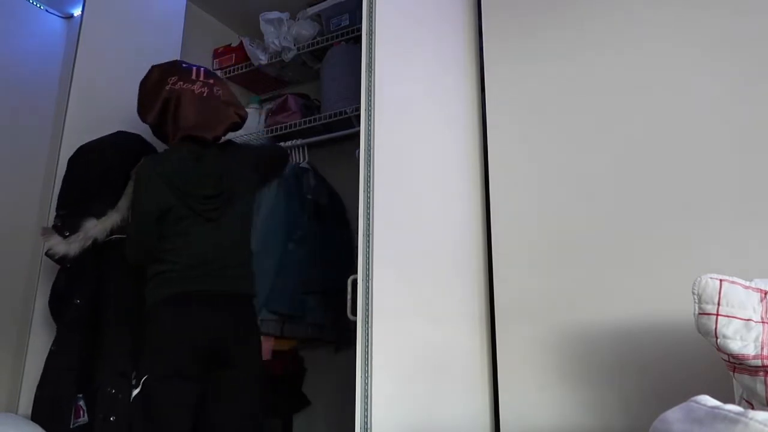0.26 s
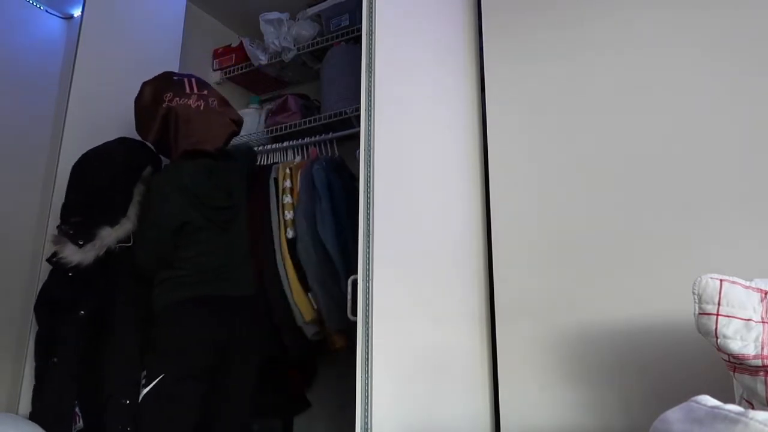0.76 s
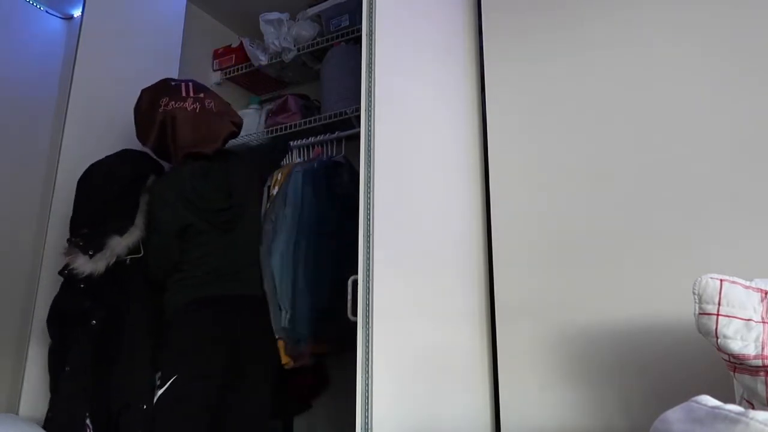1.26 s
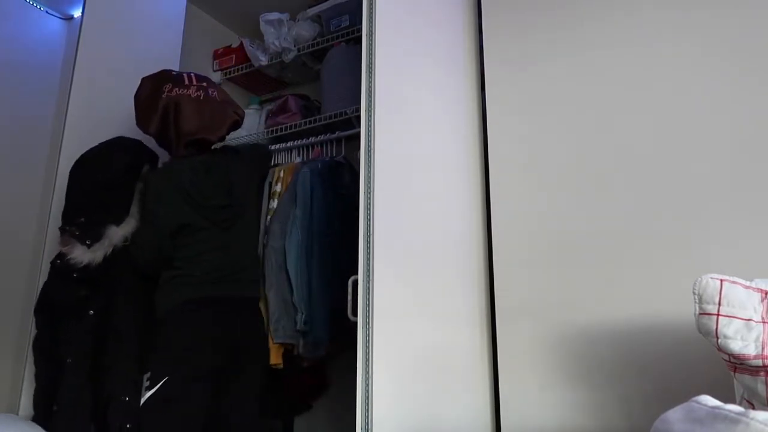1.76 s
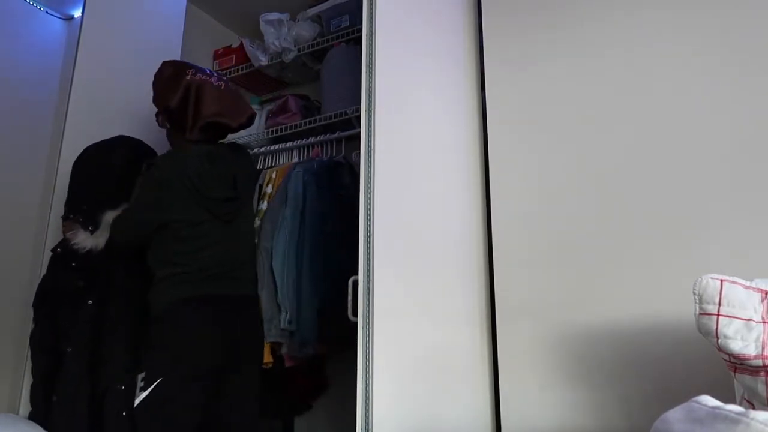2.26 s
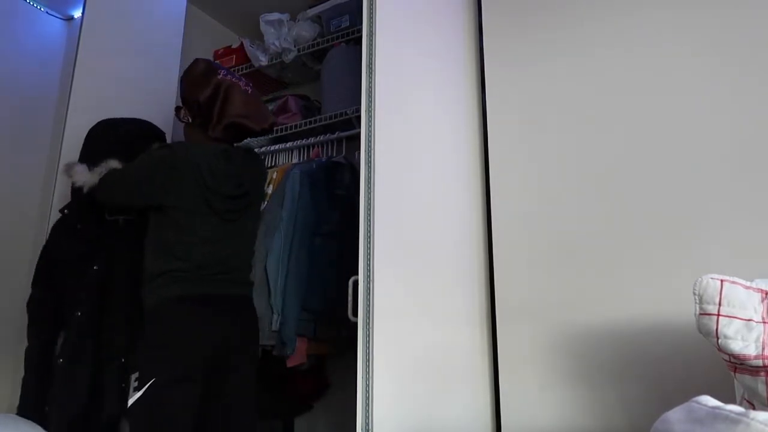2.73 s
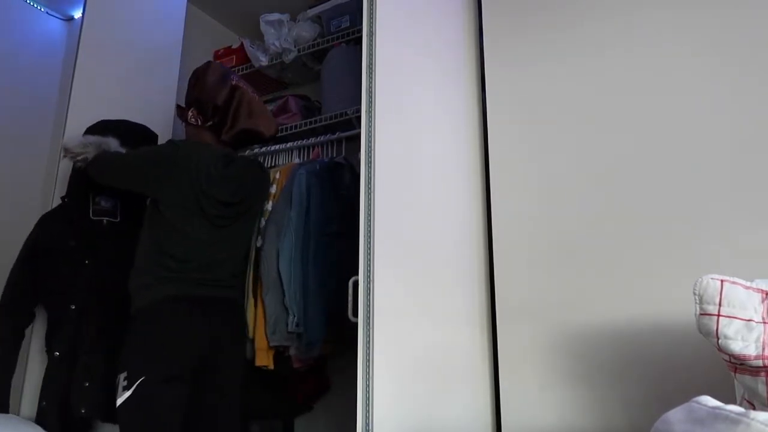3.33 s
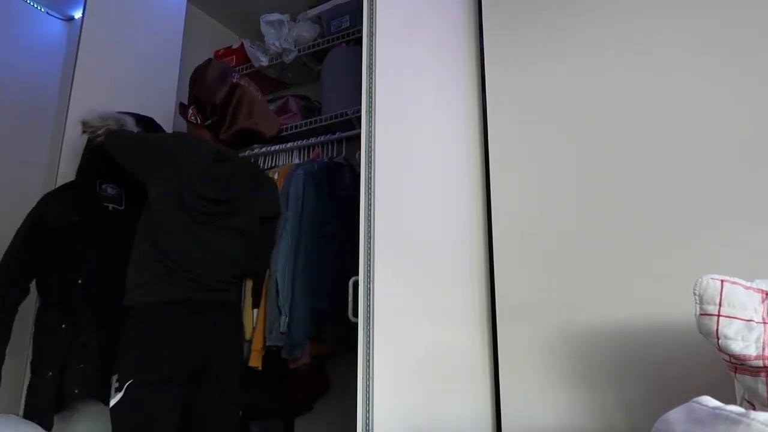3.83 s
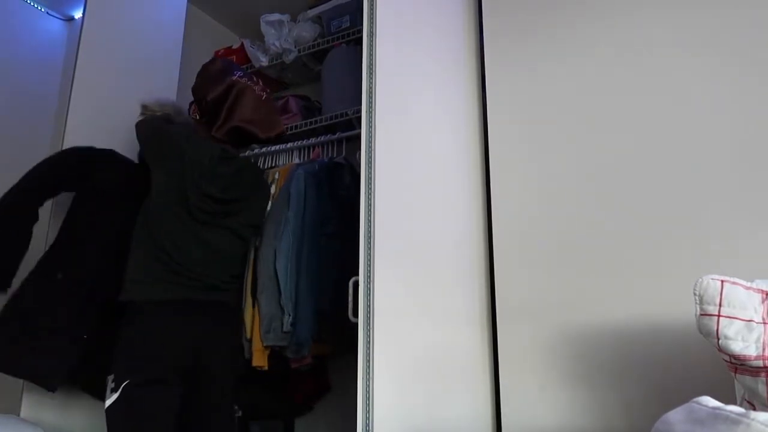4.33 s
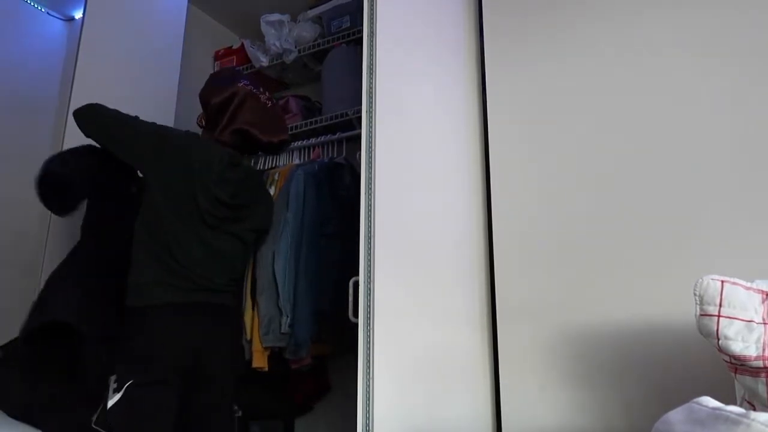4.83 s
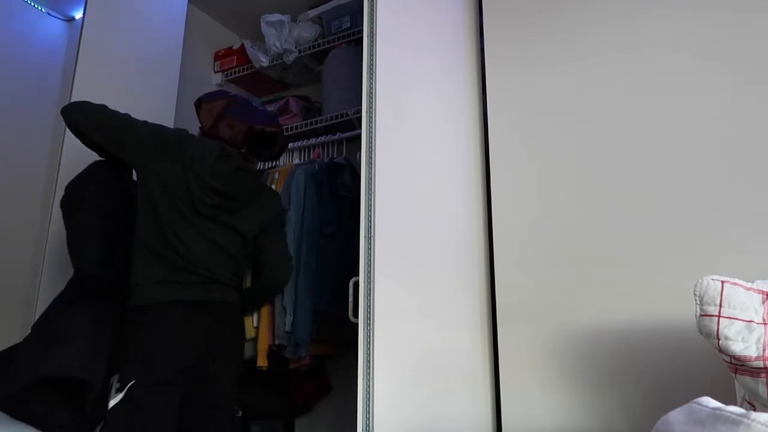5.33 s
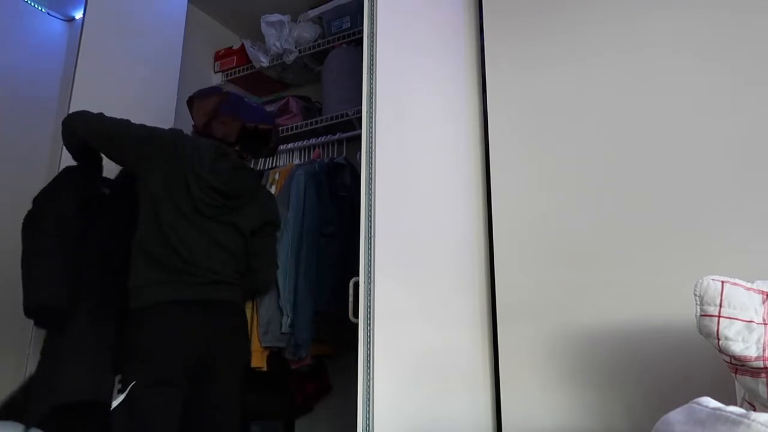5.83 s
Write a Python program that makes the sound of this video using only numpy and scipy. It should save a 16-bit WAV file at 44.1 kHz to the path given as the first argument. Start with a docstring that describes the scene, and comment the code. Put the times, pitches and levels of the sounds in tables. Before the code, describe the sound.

A quiet bedroom with low, soft house rumble and faint hiss. For the first second only clothes stir, with light swishes around 0.5-0.8 s. At about 1.1 s wire hooks clink and scrape in a quick metallic flurry, brightest near 1.17 s, followed by scattered light ticks and short drags until 2 s. A very loud, sharp hanger clack lands at 2.24 s, leaving the wire shelf trembling. More scraping and clinks lead to strong double clacks near 2.69 and 2.9 s, amid cloth swishes; a dull shelf knock follows at 3.1 s. From 3.4 s it is calmer: faint taps, then a crisp cluster at 4.17-4.2 s as a heavy coat rustles. Small dry rattles come around 4.8-5.2 s, then weaker taps. Coat fabric brushes more fully towards 6 s. The room decay is short, in clear, close stereo.

```python
"""Hangers hung and pushed along a wire closet rod in a bedroom: hooks clink, scrape and clack, the wire shelf
thuds, and later a coat beside the rod knocks. Contacts are grainy noise bursts rung through resonances, each
with its diffuse room answer; drags are spiky noise. Coats rustle as patchy shaped noise around the rod, and the
quiet room rumbles in two low bands. A close pair of microphones hears it all from across the room, with faint
hiss of its own."""
import sys
import numpy as np
from scipy import signal
from scipy.fft import rfft, irfft, next_fast_len
from scipy.io import wavfile
from scipy.ndimage import uniform_filter1d, map_coordinates

SR = 44100
rng = np.random.default_rng(int(sys.argv[2]) if len(sys.argv) > 2 else 0)


def digitize_waveform(pressure):
    """Quantize a signal to 16-bit integers and store it at the path in sys.argv[1].

    Rows of a 2-D input are taken as channels; values are limited to [-1, 1].
    """
    field = np.atleast_2d(pressure).T
    bounded = np.clip(field, -1, 1)
    quanta = np.round(bounded * 32767).astype(np.int16)
    wavfile.write(sys.argv[1], SR, quanta)


N = 268392
TIME_S = np.arange(N) / SR

# Low noise of the house: time_s [s], deep_db [dB], low_db [dB]
RUMBLE_LEVELS = [(0.0, -57, -51), (0.3, -58, -44.5), (0.55, -58, -46.5), (0.72, -56, -51),
                 (0.9, -56, -49.5), (1.9, -57, -51), (2.5, -61, -51.5), (3.1, -52.5, -51),
                 (3.35, -63, -52.5), (3.75, -55, -54), (4.4, -56, -46.5), (4.8, -60, -49.5),
                 (5.1, -64, -48.5), (5.4, -58, -50.5), (5.8, -60, -48), (6.09, -50, -47)]
# Soft low bumps: middle_s [s], length_s [s], deep_db [dB], low_db [dB]
THUMPS = [(1.598, 0.17, -44.5, -51), (2.117, 0.22, -48, -39.5), (2.885, 0.14, -51, -54),
          (3.163, 0.14, -66, -56), (4.044, 0.27, -56, -66), (4.356, 0.26, -58, -60),
          (4.821, 0.11, -59, -42), (5.613, 0.081, -63, -46)]
# One deep bump through the floor: middle_s [s], length_s [s], level_db [dB], pitch_hz [Hz]
FLOOR_BUMP = (2.5, 1, -58, 33)
# Spectra of the deep and the low rumble: frequency_hz [Hz], density_db [dB per Hz]
DEEP_SPECTRUM = [(12, -39), (20, -14), (43, 3.5), (81, 6.5), (100, -16), (130, -39), (220, -120)]
LOW_SPECTRUM = [(47, -31), (80, -9.5), (129, -4), (333, -12.5), (365, -10.5), (500, -19.5), (650, -52),
                (1100, -120)]

# Steady stir of the clothes: time_s [s], level_db [dB]
STIR_LEVELS = [(0.0, -50.5), (0.9, -51.5), (1.9, -49.5), (2.5, -52), (3.1, -59.5), (3.45, -55), (3.81, -50),
               (4.37, -43.5), (4.8, -55.5), (5.32, -51.5), (5.42, -46), (5.49, -53), (5.66, -52),
               (6.09, -41.5)]
# Single strokes of cloth on cloth: middle_s [s], length_s [s], body_db [dB], sheen_db [dB]
SWISHES = [(0.53, 0.5, -68, -50.5), (0.665, 0.38, -46, -49.5), (0.816, 0.18, -60, -42.5),
           (2.109, 0.21, -41.5, -41), (2.684, 0.28, -57, -40.5), (2.815, 0.48, -39.5, -48.5),
           (2.94, 0.13, -49, -46), (3.51, 0.13, -49, -78), (4.033, 0.32, -69, -48),
           (4.348, 0.028, -39.5, -69), (4.567, 0.98, -48, -75), (4.974, 0.92, -45, -49.5),
           (5.596, 0.23, -50.5, -50.5), (5.79, 0.42, -44, -45), (5.962, 0.54, -57, -40)]
# Spectra of the cloth's soft body and fine sheen: frequency_hz [Hz], density_db [dB per Hz]
BODY_SPECTRUM = [(180, -27), (300, -1.5), (494, -2), (775, 0), (919, -2), (977, -1.5), (2100, 0.5),
                 (4310, -8), (5500, -13), (7150, -20), (12100, -120)]
SHEEN_SPECTRUM = [(2060, -4.5), (3500, 0.5), (5450, -3.5), (7770, -4.5), (9430, -21), (11400, -12.5),
                  (13900, -23.5), (15100, -41), (15500, -38)]
STIR_SHEEN_DB = -5.5  # sheen of the steady stir over its body
SHAKE_DB, SHAKE_RISE_S, SHAKE_T60_S = -31, 0.0022, 0.57  # coats shaken by a clack: level over the clack's

# Hooks dragged on the rod: start_s [s, full level reached], hold_s [s],
# low_rings_db [dB], middle_rings_db [dB], upper_rings_db [dB]
SLIDES = [(1.108, 0.42, -49.5, -58, -62), (1.33, 0.019, -45, -51, -55), (1.474, 0.024, -54, -50, -51),
          (1.769, 0.03, -51, -49, -47), (1.806, 0.032, -48, -57, -53), (2.33, 0.017, -38, -42, -73),
          (2.732, 0.13, -40.5, -40.5, -48), (3.088, 0.079, -40.5, -63, -66)]
# Hook resonances: pitch_hz [Hz], width_hz [Hz], strength_db [dB]
HOOK_MODES = [(1820, 130, 3.5), (1978, 59, 6), (2210, 240, 5.5), (2487, 75, 4.5), (2754, 75, 9),
              (2965, 68, 5.5), (3106, 250, 5.5), (3440, 150, 1), (3987, 99, -1.5), (4260, 120, -0.5),
              (4590, 130, -5.5), (5700, 860, -7), (6410, 300, -2.5)]
LOW_RINGS, MIDDLE_RINGS = HOOK_MODES[:3], HOOK_MODES[3:8]
UPPER_RINGS, TOP_RINGS = HOOK_MODES[8:11], HOOK_MODES[11:]
# Broad scratch of a dragged hook: frequency_hz [Hz], density_db [dB per Hz]
SCRATCH_SPECTRUM = [(1200, -33), (2000, 3), (3400, 8), (4800, -10), (7000, -53)]
SCRATCH_DB = -7  # over the middle rings
SLIDE_ATTACK_S, SLIDE_FADE_DB_PER_S = 0.018, 155

# In both contact tables the layer columns count from level_db, and each layer adds a fixed trim of its own.
# Light hooks touching the rod: touch_s [s], level_db [dB], upper_rings_db [dB], top_rings_db [dB],
# strongest_ring_hz [Hz], after_rattle_and_room_db [dB over the blow]
CLINKS = [(1.129, -25.5, -20, -25, 1810, 1), (1.1365, -22.5, -15, -12, 1890, 2),
          (1.149, -22, -23, -22, 1880, 3), (1.161, -25.5, -7, -15, 2080, -3),
          (1.1657, -8, -18, -9, 2270, -5.5), (1.1912, -17.5, -20, -15, 2520, -5),
          (1.203, -18.5, -20, -28, 2240, -20), (1.225, -25, -22, -28, 2020, -10),
          (1.3301, -16, -11.5, -34, 2575, -0.5), (1.4195, -28.5, -27, -13, 1930, -9),
          (1.4776, -21.5, -1, -23, 2600, -6), (1.5601, -20, -12, -6, 2550, -5.5),
          (1.7761, -21.5, -9, -15.5, 2710, 1), (1.7918, -24.5, -4, -23, 2740, -11),
          (1.796, -23, -19, -19, 2200, -15), (1.829, -23, -28, -25, 2210, 0),
          (1.833, -26.5, -14, -20, 3180, -7), (1.845, -28, -16, -32, 2220, -5),
          (1.855, -25, -23, -23, 2230, -18), (1.888, -20.5, -28, -34, 2280, -11),
          (1.897, -31, -26, -30, 1850, -3), (1.964, -16.5, -39, -7.5, 2230, -10.5),
          (2.4319, -21.5, -31.5, -17, 2220, -1), (2.4673, -22.5, -12, -7, 2240, -9),
          (2.733, -23, -9, -21, 2420, -6), (2.774, -17.5, -8, -25, 2650, -10),
          (2.797, -20, -11, -23, 2450, -4), (2.806, -19, -15, -18, 2480, -10),
          (2.838, -29, -22, -20, 2860, -8), (2.858, -22.5, -24, -25, 1960, -6)]
# Hangers knocking together and on the shelf, and from LEAVE_ROD_S on knocks at a coat beside the rod: touch_s
# [s], level_db [dB], shelf_thud_db [dB], treble_db [dB], # brightest_hz [Hz], after_rattle_and_room_db [dB over
# the blow]
CLACKS = [(1.5908, -28.5, -19, -23, 1580, -3), (2.031, -44.5, 1, -19, 1660, 9.5),
          (2.085, -20, -7.5, -4, 1840, -1), (2.113, -22.5, -28, -10, 2700, 0.5),
          (2.2352, 2, -25.5, -13.5, 1590, -6), (2.582, -31.5, -14.5, -8, 1310, 11),
          (2.59, -28, -15, -11, 2150, 4), (2.6847, -8, -22, -11, 2320, -4),
          (2.6876, -6, -17.5, -17, 2430, -5), (2.892, -3.5, -10, -11.5, 1420, -0.5),
          (2.9022, -0.5, -20.5, -6.5, 3640, -6.5), (3.118, -33.5, 0, -17, 1854, 8),
          (3.1358, -29, -6, -19, 2013, 4), (3.1579, -33, 2, -31, 2110, -2.5),
          (3.467, -37, -8, -11, 1530, -2), (3.583, -35.5, -10.5, -2, 2670, -1.5),
          (3.6638, -37, -37, 1, 2010, 0.5), (3.7106, -28, -15, -10, 2350, 4),
          (3.728, -26, -16, -15, 2300, -5), (3.774, -33.5, -21, 1.5, 3380, 1.5),
          (4.1682, -22, -15.5, -7, 2960, 4), (4.1739, -15, -21.5, -3.5, 2800, 0),
          (4.1798, -9, -34, -13, 3330, -3.5), (4.189, -17, -27, -13, 2680, -2),
          (4.22, -23.5, -28, -18, 2300, -6), (4.554, -37.5, -24, -30, 1610, 11.5),
          (4.8016, -25.5, -12, -6, 2330, 5.5), (4.815, -25.5, -10, -15, 3300, 0.5),
          (4.8874, -24.5, -16, -22, 2750, 3.5), (4.8957, -22, -13, -16, 3200, -6),
          (4.905, -23.5, -18, -15, 1740, 3), (4.915, -22, -26, -28, 3170, -16),
          (4.926, -23, -13, -14, 1760, -9), (4.945, -32, -16, -4, 4200, -18),
          (4.9957, -24.5, -18, -18, 4100, -6), (4.998, -29.5, -16, -14, 1510, -4),
          (5.1452, -21, -47, -14, 3000, 2), (5.1491, -19, -34, -14, 2900, -6),
          (5.1546, -15.5, -50, -16, 3140, -4), (5.1664, -20, -30, -9, 3280, -2),
          (5.1731, -22, -35, -10, 2700, -6), (5.186, -23.5, -23, -10, 3540, -3),
          (5.505, -37, -10.5, -24, 1990, 7), (5.583, -38.5, -3, -15, 2200, -3),
          (5.6278, -37.5, -11, -12, 2750, 4), (5.8545, -28, -13, -13, 2000, 1.5),
          (5.9365, -27.5, -42, -15, 2610, -6), (6.0708, -34, -13, -9, 1490, 16)]
# Resonances of hanger arms, shelf and shelf wires: pitch_hz [Hz], width_hz [Hz], strength_db [dB]
ARM_MODES = [(892, 85, 5), (1038, 60, 6), (1220, 370, 0.5)]
SHELF_MODES = [(251, 130, -6), (348, 46, 2), (395.4, 31.4, 3.5), (488, 25.5, -0.5), (575.6, 40, -1)]
WIRE_MODES = [(327, 25, 4.5), (389, 11.6, 13.5), (479, 14, -0.5), (580, 38, 3.5), (662, 19, 2),
              (748, 8.9, 5.5), (830, 9.3, -17), (1010, 6.1, 6), (1150, 12, -3), (1180, 26, -6),
              (1244, 37, -1), (1370, 14, -15), (1576, 49, 2), (1752, 15, 13), (1833, 16, 5),
              (1986, 14.6, 12.5), (2204, 8.6, 9), (2450, 20, 15), (2610, 39, 5.5), (2745, 10, 8),
              (2894, 21, 10), (3250, 22, 3), (3540, 66, 1.5), (4200, 120, -1), (4410, 65, 0)]
# Spectra of a clack's crack and of the treble edge of a contact: frequency_hz [Hz], level_db [dB]
CRACK_SPECTRUM = [(900, -40), (1500, 14), (2200, 20.5), (3000, 16), (4000, -28), (6000, -56)]
EDGE_SPECTRUM = [(2500, -2), (3700, 8.5), (5500, 5.5), (7000, -1), (9000, -12), (12000, -31), (16000, -39)]
CLINK_RISE_S, CLINK_T60_S = 0.000791, 0.017  # rise of a contact at 0 dB
CLACK_RISE_S, CLACK_T60_S = 0.001172, 0.031  # likewise
SOFTENING = 0.15  # dB of rise time gained per dB that a contact is weaker
TOUCH, GRAIN_DB = 0.3, 4.5  # share of a contact in its first sharp touch; size scatter of the rattle's grains
LOAD_SHIFT, TOP_SHIFT = 0.004, 0.025  # share by which wire and top-ring pitches scatter between contacts
CRACK_HZ = 2400  # brightest pitch at which the crack's spectrum stays in place
CRACK_FOLLOW, AWAY_FOLLOW = 0.13, 0.53  # how far it moves with that pitch (0-1): at the rod, at the coat
EDGE_DRIER_DB = 2  # the treble edge of a clack rattles on less than its body
ARMS_DB, ARMS_FOLLOW = 3, 0.49  # arm ring over the clack's level; its share of the thud's dB
WIRES_DB, AWAY_WIRES_DB = -1, -4.5  # wire ring over the clack's level; added at the coat
LEAVE_ROD_S = 3.3  # from then on the hands work at a coat beside the rod
# Shelf trembling after a clack: level over the clack's; hanger arms over the shelf
SHUDDER_DB, SHUDDER_ARMS_DB, SHUDDER_T60_S = -30, -2.5, 0.56

# Bedroom decay: frequency_hz [Hz], t60_s [s]
BEDROOM_T60 = [(300, 0.42), (1500, 0.3), (4000, 0.31), (10000, 0.23)]
# Stereo width of cloth and room, then of hooks and hangers: frequency_hz [Hz], side_over_mid_db [dB]
SPREAD_WIDTH = [(60, -30), (120, -15.5), (240, -8), (480, -6.5), (950, -9), (1900, -17.5), (3800, -8.5),
                (6000, -2.5), (7800, -2), (9400, 14.5), (11400, 4), (15000, 13)]
HIT_WIDTH = [(60, -26), (290, -55), (640, -26), (1400, -24.5), (3100, -16), (5000, -4), (7000, -3.5),
             (9400, 13), (15000, 16)]
# Microphone self-noise: frequency_hz [Hz], density_db [dB per Hz]
HISS_SPECTRUM = [(2500, -30), (5000, 6), (8000, -9), (12000, -30), (15500, 12)]
SMALL_HZ, TOP_HZ = 208, 15680  # hooks, hangers and wires fall off below the first; band limit


def amp(db):
    """Gain of a level in dB."""
    return 10 ** (np.asarray(db) / 20)


def unit(x):
    """Scale to rms 1 along the last axis."""
    return x / np.sqrt(np.mean(x ** 2, axis=-1, keepdims=True) + 1e-20)


def along(points, hz):
    """Read (Hz, value) points on a log frequency axis."""
    f, v = np.transpose(points)
    return np.interp(np.log(hz + 1), np.log(f + 1), v)


def curves(rows):
    """One value per sample for each column after the time; the ends are held."""
    s, *columns = np.transpose(rows)
    return [np.interp(TIME_S, s, column) for column in columns]


def wobble(rate):
    """A smooth random curve, rate knots a second."""
    knots = rng.standard_normal(int(N * rate / SR) + 4)
    return map_coordinates(knots, [TIME_S * rate])


def swell(middle, length):
    """A smooth rise and fall of height 1."""
    return np.cos(np.pi * np.clip((TIME_S - middle) / length, -.5, .5)) ** 2


def together(*gains):
    """Gain of unrelated sounds heard at once: their powers add."""
    return np.sqrt(sum(g ** 2 for g in gains))


def filtered(x, response):
    """Multiply the spectrum of x by a complex response of frequency."""
    n = x.shape[-1]
    m = next_fast_len(n + SR // 10)
    return irfft(rfft(x, m) * response(np.fft.rfftfreq(m, 1 / SR)), m)[..., :n]


def modes(table, spread_db=0, shift=0):
    """Causal response of (Hz, width, dB) resonances, strengths and pitches scattered at random."""
    hz, width, db = np.transpose(table)
    gains = amp(db + spread_db * rng.standard_normal(len(hz)))
    centres = hz * (1 + shift * rng.standard_normal(len(hz)))

    def response(f):
        return sum((-1) ** k * g * 1j * f * w / (c * c - f * f + 1j * f * w)
                   for k, (c, w, g) in enumerate(zip(centres, width, gains)))
    return response


def patchy(depth_db):
    """Two unrelated white noises that share patches of random gain in time and frequency."""
    z = signal.stft(rng.standard_normal((2, N)), nperseg=512)[2]
    field = rng.standard_normal(z.shape[1:])
    field = uniform_filter1d(uniform_filter1d(field, size=6, axis=0), size=10, axis=1)
    return signal.istft(z * amp(depth_db * field / field.std()), nperseg=512)[1][:, :N]


def coloured(x, spectrum):
    """Noise shaped by (Hz, dB) points, rms 1."""
    return unit(filtered(x, lambda hz: amp(along(spectrum, hz))))


def after_clacks(clacks, level_db, t60):
    """One quick rise and exponential decay for each clack, level_db over the clack's level."""
    gains = []
    for s, db, *_ in clacks:
        t = np.clip(TIME_S - s, 0, None)
        gains.append(amp(db + level_db - 60 * t / t60) * (1 - np.exp(-t / SHAKE_RISE_S)))
    return gains


CHATTER = wobble(90)  # unevenness of swinging hangers


def rumble():
    """The low noise of the house in two bands, swelling as the body moves, and one sine bump in the floor."""
    deep_db, low_db = curves(RUMBLE_LEVELS)
    deep_gain = together(amp(deep_db), *(amp(db) * swell(s, length) for s, length, db, _ in THUMPS))
    low_gain = together(amp(low_db), *(amp(db) * swell(s, length) for s, length, _, db in THUMPS))
    deep = deep_gain * amp(2.0 * wobble(9.3)) * coloured(patchy(0.88), DEEP_SPECTRUM)
    s, length, db, hz = FLOOR_BUMP
    deep[0] += amp(db) * swell(s, length) * np.sin(2 * np.pi * hz * TIME_S)  # mid signal only
    low_wobble_db = 2.03 * wobble(6) + 1.46 * wobble(13)
    return deep + low_gain * amp(low_wobble_db) * coloured(patchy(1.5), LOW_SPECTRUM)


def coats():
    """Cloth on cloth: a soft body and a finer sheen, both crinkling; every clack shakes the body."""
    stir_db, = curves(STIR_LEVELS)
    shaken = after_clacks(CLACKS, SHAKE_DB, SHAKE_T60_S)
    body_strokes = [amp(db) * swell(s, length) for s, length, db, _ in SWISHES]
    sheen_strokes = [amp(db) * swell(s, length) for s, length, _, db in SWISHES]
    body_gain = together(amp(stir_db), *shaken, *body_strokes)
    sheen_gain = together(amp(stir_db + STIR_SHEEN_DB), *sheen_strokes)
    crinkle = wobble(30)
    body_crinkle = amp(1.2 * crinkle + 0.37 * wobble(150))
    sheen_crinkle = amp(1.42 * crinkle + 0.4 * wobble(320))
    body = body_gain * body_crinkle * coloured(patchy(1.6), BODY_SPECTRUM)
    sheen = sheen_gain * sheen_crinkle * coloured(patchy(3.5), SHEEN_SPECTRUM)
    return body + sheen


def slides():
    """Hooks stick and slip along the rod: spiky noise in the hook's modes, streaked by the shelf wires."""
    grit = patchy(2.2) * amp(2.5 * wobble(200) + 0.8 * wobble(25))
    wires = modes(WIRE_MODES)
    rings = []
    for table in (LOW_RINGS, MIDDLE_RINGS, UPPER_RINGS):
        hook = modes(table)
        rings.append(unit(filtered(grit, lambda f: hook(f) ** 2 * (1 + 0.95 * wires(f)))))
    rings[1] = rings[1] + amp(SCRATCH_DB) * coloured(grit, SCRATCH_SPECTRUM)
    out = np.zeros((2, N))
    for s, hold, *levels in SLIDES:
        attack = np.clip((TIME_S - s) / SLIDE_ATTACK_S + 1, 0, 1) ** 2
        fade = amp(-SLIDE_FADE_DB_PER_S * np.clip(TIME_S - s - hold, 0, None))
        out += attack * fade * sum(amp(db) * ring for db, ring in zip(levels, rings))
    return out


def room_tail(size):
    """A fresh pair of room answers of energy 1; each frequency dies at its own speed."""
    hz, t, z = signal.stft(rng.standard_normal((2, size)), SR, nperseg=128)
    decay = amp(-60 * t / along(BEDROOM_T60, hz)[:, None])
    tail = signal.istft(z * decay, SR, nperseg=128)[1][:, :size]
    tail *= np.clip((np.arange(size) / SR - .004) / 0.0045, 0, 1)  # walls answer after the direct sound
    start = rng.integers(len(CHATTER) - size)
    tail *= amp(1.66 * CHATTER[start:start + size])  # neighbouring hangers keep chattering unevenly
    return tail / np.linalg.norm(tail, axis=1, keepdims=True)


def strike(out, s, layers, rise, t60, room_db):
    """One contact: a sharp touch and grainy rattle through (dB, response, drier dB if any) layers, then the room."""
    size = SR // 2
    t = np.arange(size) / SR
    grains = rng.standard_normal((2, size)) * amp(GRAIN_DB * rng.standard_normal(size))
    rattle = grains * (1 - np.exp(-t / max(rise, .0003))) ** 2 * amp(-60 * t / max(t60, .005))
    rattle *= 1 + 2.3 * amp(-60 * t / 0.0061)  # the first bounces are the hardest
    touch = TOUCH * np.linalg.norm(rattle, axis=1, keepdims=True) * [.5, 1, .5]  # rounded over three samples
    rattle[:, round(rise * SR):][:, :3] += touch
    tail = room_tail(size) * np.linalg.norm(rattle, axis=1, keepdims=True)
    sound = np.zeros((2, size))
    for db, ring, *drier_db in layers:
        blow, wet = filtered(np.array([rattle, tail]), ring)
        # blow and room answer start from equal energy
        blow *= np.linalg.norm(wet, axis=1, keepdims=True) / np.linalg.norm(blow, axis=1, keepdims=True)
        crest = 3.59 * np.linalg.norm(wet[0]) / np.sqrt(SR * (rise + t60 / 7))  # expected peak of such a rattle
        sound += amp(db) / crest * (blow + amp(room_db - sum(drier_db)) * wet)
    return out + np.pad(sound, ((0, 0), (round((s - rise) * SR), N)))[:, :N]


def treble_edge(f):
    """Bright edge of a contact."""
    return amp(along(EDGE_SPECTRUM, f))


def clinks():
    """Thin wire hooks ring in narrow bands with dark valleys between and below them."""
    out = np.zeros((2, N))
    for s, db, upper_db, top_db, ring_hz, room_db in CLINKS:
        low = modes(LOW_RINGS + MIDDLE_RINGS, spread_db=7.0)
        upper = modes(UPPER_RINGS, spread_db=3.0)
        top = modes(TOP_RINGS, spread_db=2.5, shift=TOP_SHIFT)
        own = modes([(ring_hz, 150, 0)])
        wires = modes(WIRE_MODES, spread_db=5.0, shift=LOAD_SHIFT)
        layers = [(db - 5.5, lambda f: low(f) ** 2),
                  (db - 6.5, lambda f: low(f) * wires(f)),
                  (db - 2.0, lambda f: own(f) ** 2),
                  (db + upper_db + 4.0, lambda f: upper(f) ** 2),
                  (db + top_db + 0.5, lambda f: top(f) ** 2),
                  (db + top_db + 1.5, treble_edge)]
        out = strike(out, s, layers, CLINK_RISE_S * amp(-SOFTENING * db), CLINK_T60_S, room_db)
    return out


def clacks():
    """Hangers, and later a coat beside the rod, crack broadly, ring a little in their arms, thud in the shelf
    and set its wires ringing."""
    out = np.zeros((2, N))
    for s, db, thud_db, treble_db, bright_hz, room_db in CLACKS:
        away = s > LEAVE_ROD_S
        stretch = (CRACK_HZ / bright_hz) ** (AWAY_FOLLOW if away else CRACK_FOLLOW)
        own = modes([(bright_hz, 0.32 * bright_hz, 0)])
        arms, shelf = modes(ARM_MODES), modes(SHELF_MODES, spread_db=0.5)
        wires = modes(WIRE_MODES, spread_db=5.5, shift=LOAD_SHIFT)
        layers = [(db - 3.0, lambda f: amp(along(CRACK_SPECTRUM, f * stretch))),
                  (db - 8.0, lambda f: own(f) ** 2),
                  (db + treble_db + 4.0, treble_edge, EDGE_DRIER_DB),
                  (db + ARMS_DB + ARMS_FOLLOW * thud_db, lambda f: arms(f) / (1 + (f / 2500) ** 4)),
                  (db + thud_db + 12.0, lambda f: shelf(f) / (1 + (f / 1200) ** 4)),
                  (db + WIRES_DB + AWAY_WIRES_DB * away, wires)]
        out = strike(out, s, layers, CLACK_RISE_S * amp(-SOFTENING * db), CLACK_T60_S, room_db)
    return out


def shudder():
    """After each clack at the rod the shelf and hanging arms go on trembling in their own resonances."""
    at_rod = [clack for clack in CLACKS if clack[0] < LEAVE_ROD_S]
    gain = together(*after_clacks(at_rod, SHUDDER_DB, SHUDDER_T60_S))
    shelf_modes, arm_modes = modes(SHELF_MODES), modes(ARM_MODES)
    shelf = unit(filtered(patchy(2.6), lambda f: shelf_modes(f) ** 2))
    arms = unit(filtered(patchy(2.6), lambda f: arm_modes(f) ** 2))
    return gain * (shelf + amp(SHUDDER_ARMS_DB) * arms)


def scene():
    """Mix sources as mid and side for the close microphone pair; the side is shaped by frequency."""
    spread = rumble() + coats()
    near = slides() + clinks() + clacks() + shudder()
    near = filtered(near, lambda hz: (1j * hz / (SMALL_HZ + 1j * hz)) ** 2)  # thin wire radiates little bass
    mid = near[0] + spread[0]
    near_side = filtered(near[1], lambda hz: amp(along(HIT_WIDTH, hz)))
    spread_side = filtered(spread[1], lambda hz: amp(along(SPREAD_WIDTH, hz)))
    side = near_side + spread_side
    return np.array([(mid + side) * amp(-0.32), (mid - side) * amp(-0.57)])


def record(dry):
    """Microphone pair: faint hiss, stronger in the side; soft limiting near full scale; a sharp band limit."""
    mid, side = coloured(rng.standard_normal((2, N)), HISS_SPECTRUM) * amp([[-80], [-68]])
    wet = dry + np.array([mid + side, mid - side])
    soft = wet / (1 + np.abs(wet) ** 8) ** (1 / 8)
    return filtered(soft, lambda hz: hz < TOP_HZ)


dry = scene()
out = record(dry)
digitize_waveform(out)
```